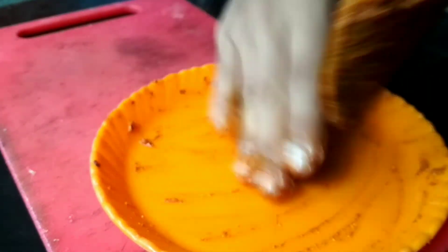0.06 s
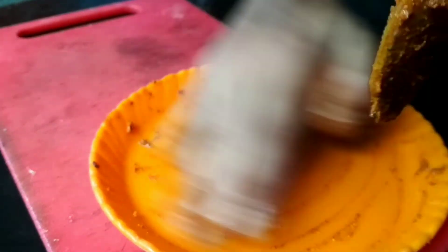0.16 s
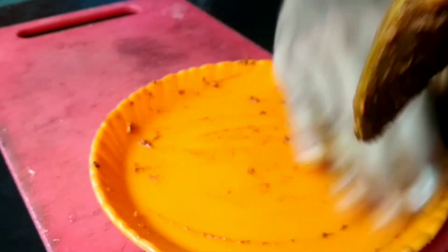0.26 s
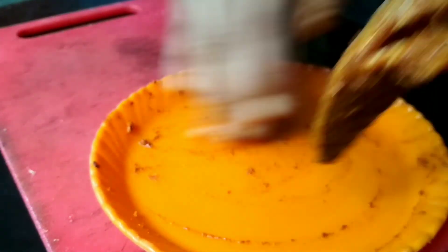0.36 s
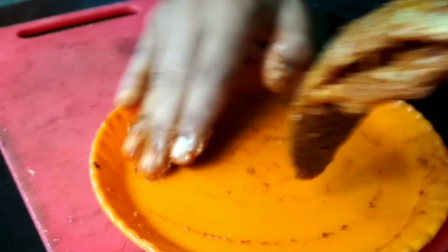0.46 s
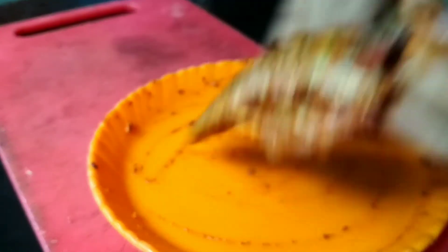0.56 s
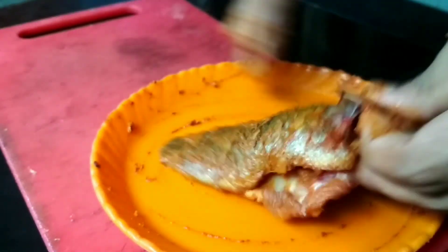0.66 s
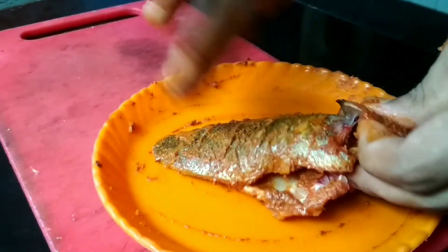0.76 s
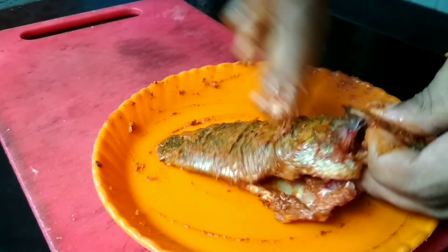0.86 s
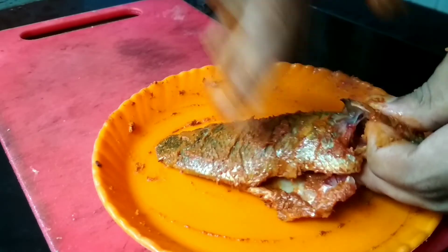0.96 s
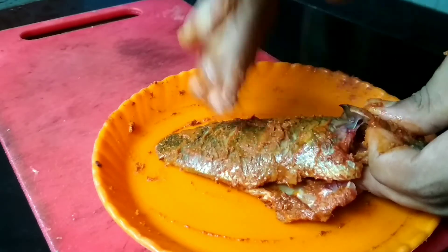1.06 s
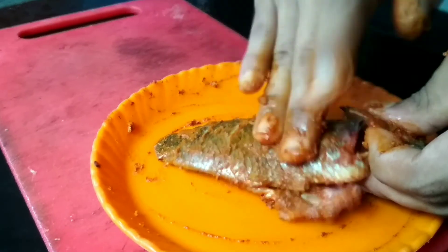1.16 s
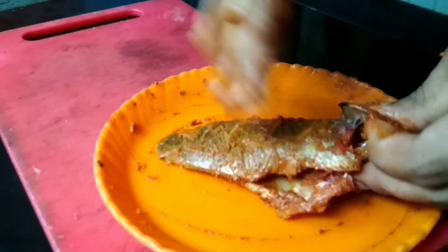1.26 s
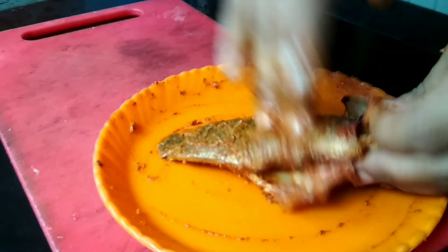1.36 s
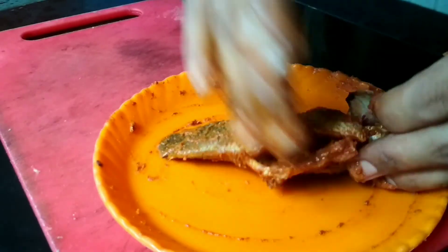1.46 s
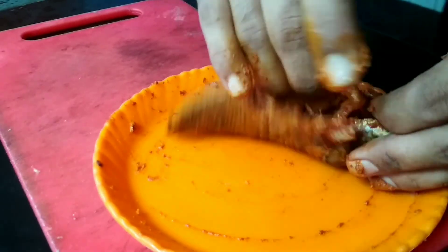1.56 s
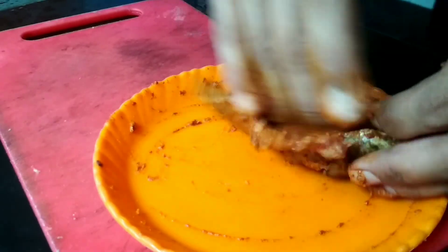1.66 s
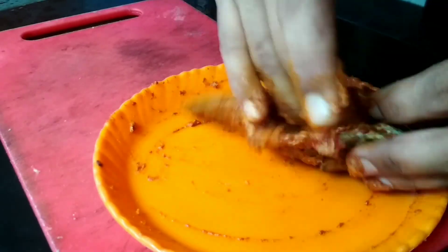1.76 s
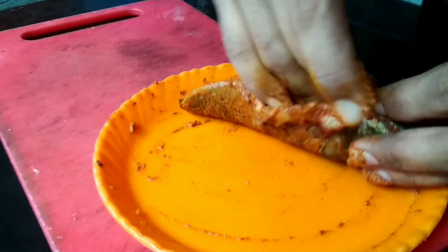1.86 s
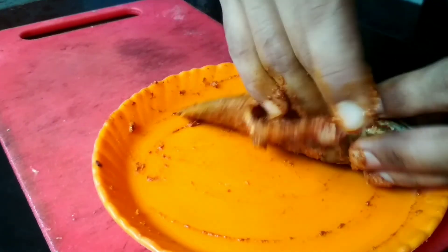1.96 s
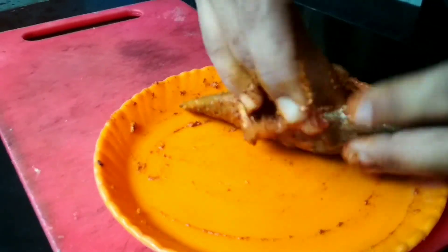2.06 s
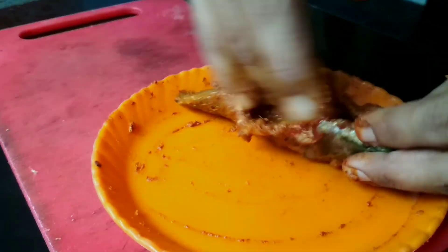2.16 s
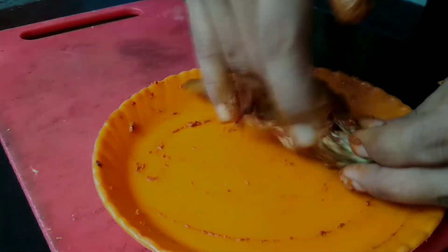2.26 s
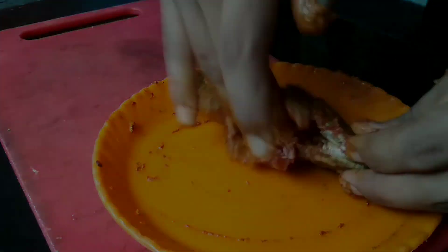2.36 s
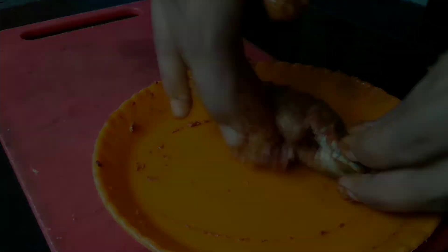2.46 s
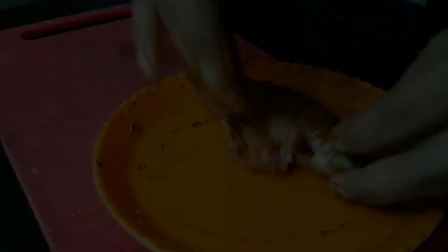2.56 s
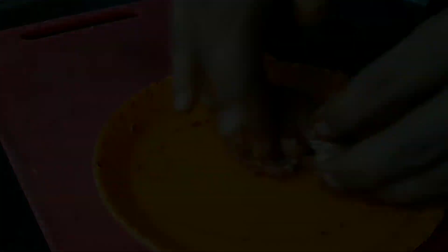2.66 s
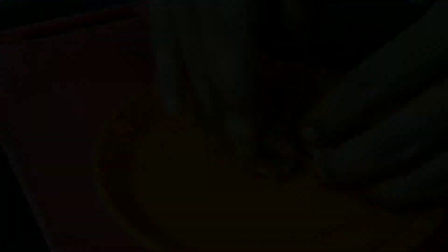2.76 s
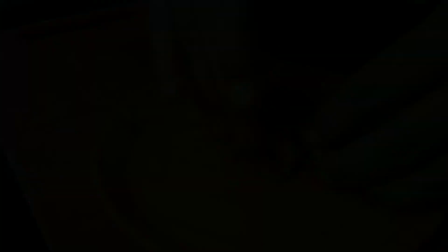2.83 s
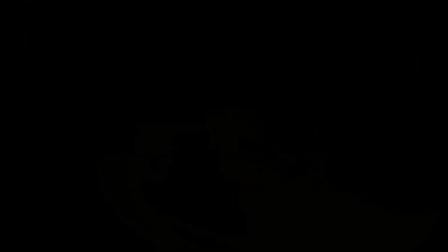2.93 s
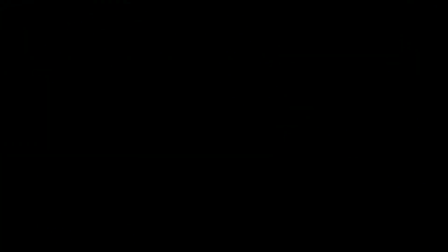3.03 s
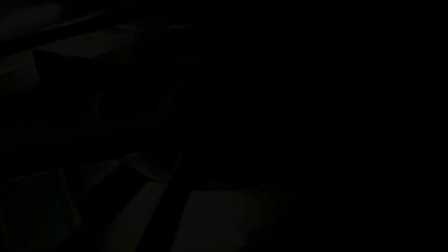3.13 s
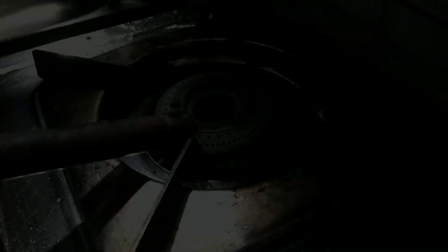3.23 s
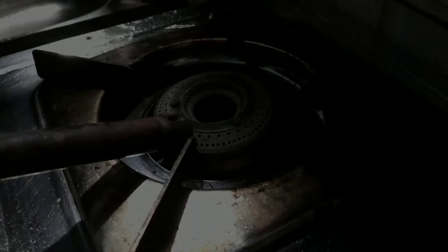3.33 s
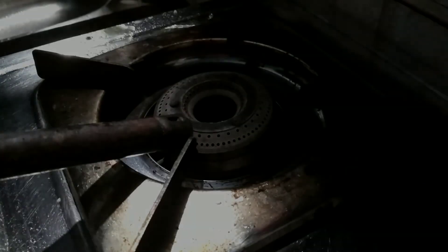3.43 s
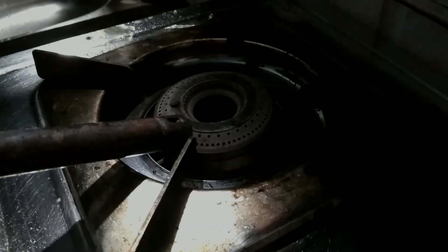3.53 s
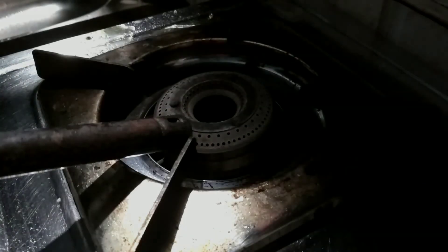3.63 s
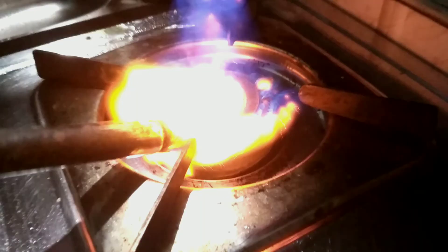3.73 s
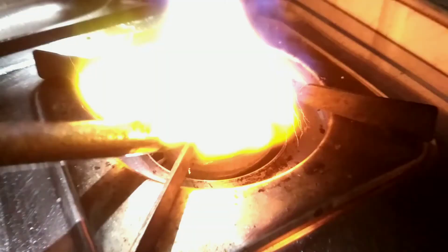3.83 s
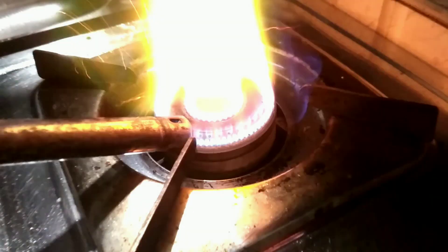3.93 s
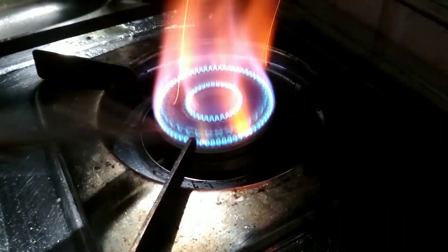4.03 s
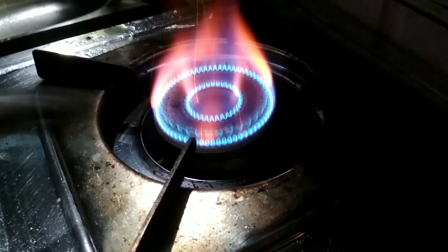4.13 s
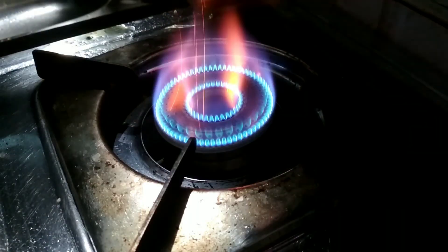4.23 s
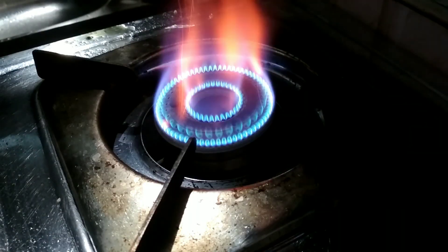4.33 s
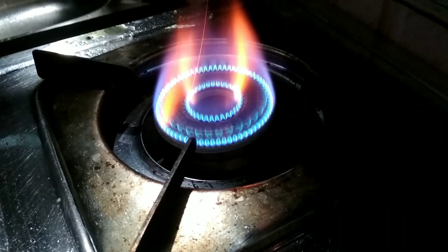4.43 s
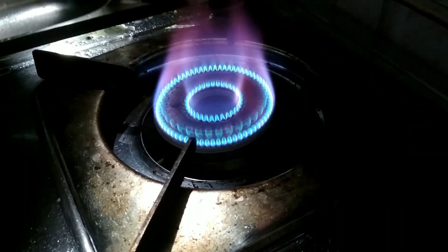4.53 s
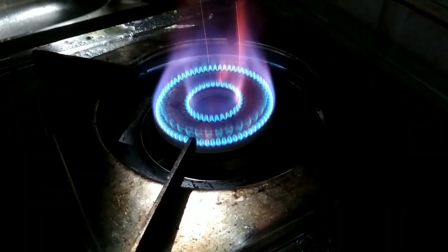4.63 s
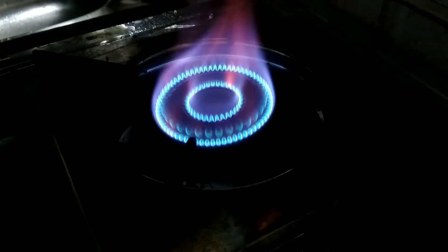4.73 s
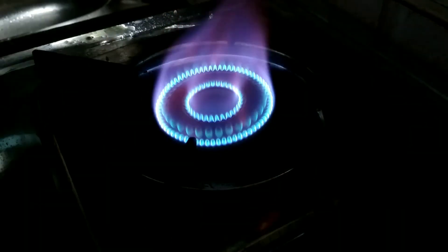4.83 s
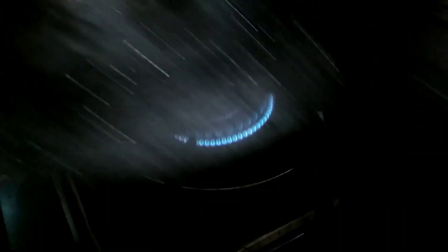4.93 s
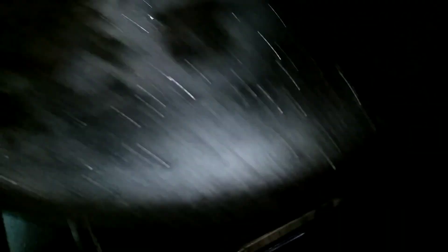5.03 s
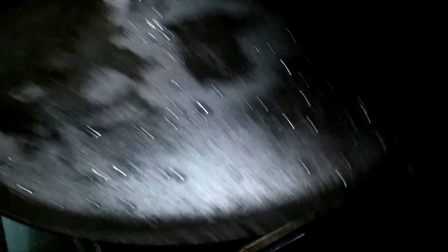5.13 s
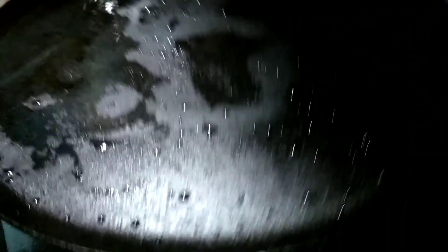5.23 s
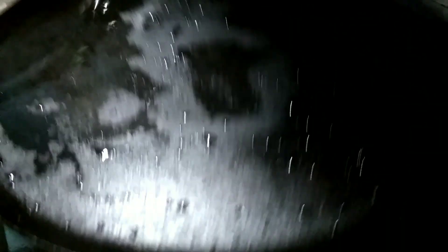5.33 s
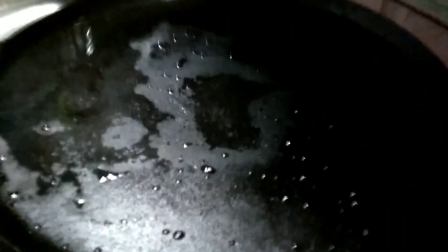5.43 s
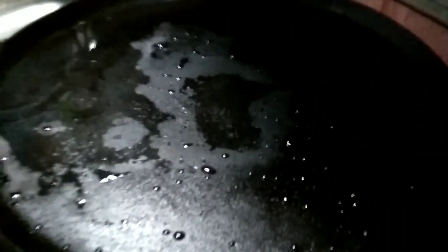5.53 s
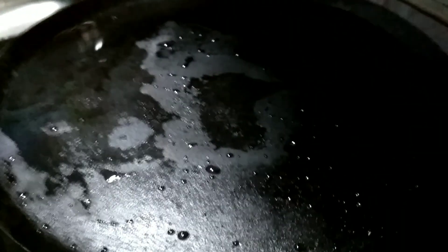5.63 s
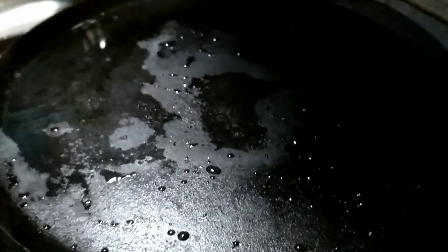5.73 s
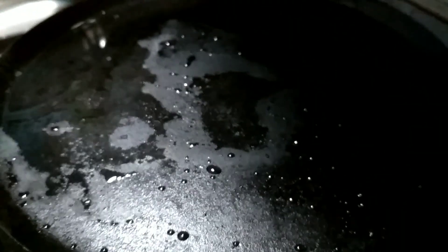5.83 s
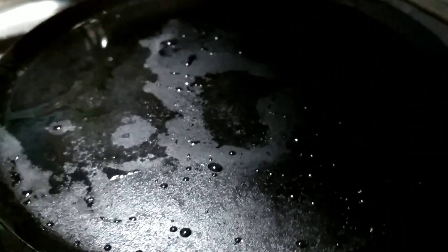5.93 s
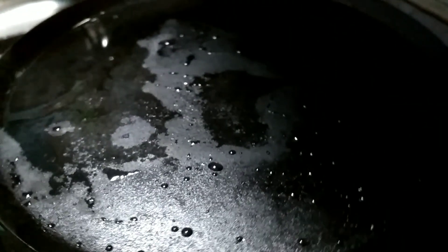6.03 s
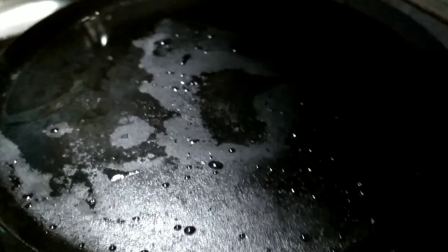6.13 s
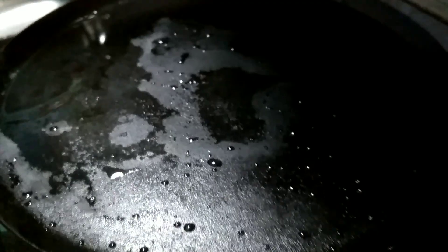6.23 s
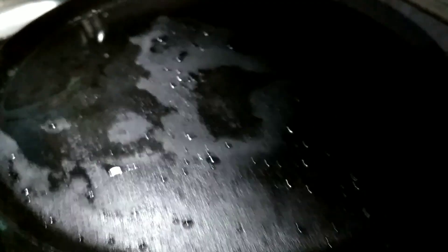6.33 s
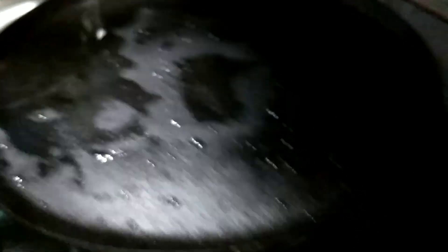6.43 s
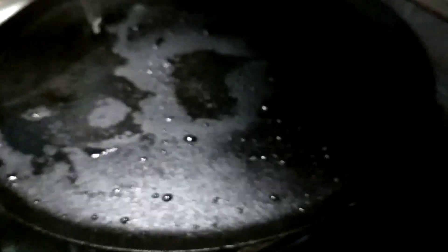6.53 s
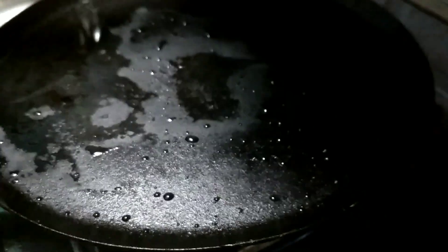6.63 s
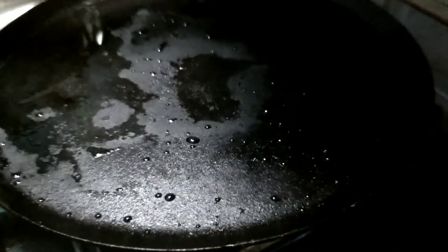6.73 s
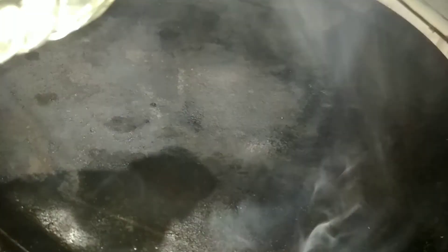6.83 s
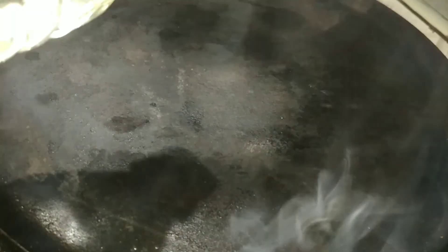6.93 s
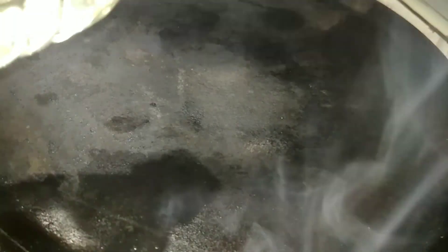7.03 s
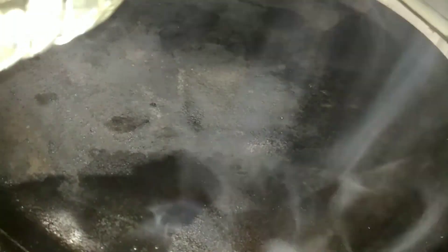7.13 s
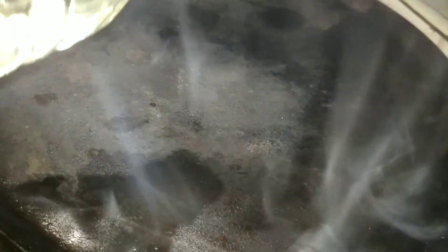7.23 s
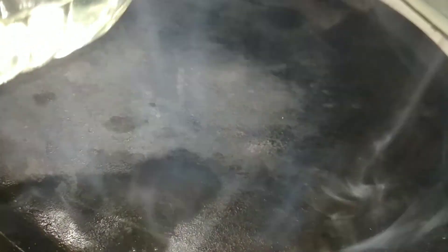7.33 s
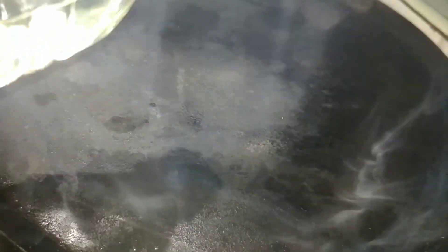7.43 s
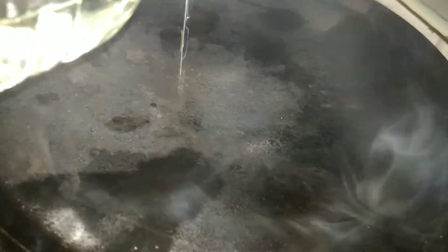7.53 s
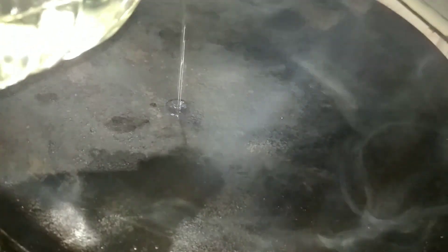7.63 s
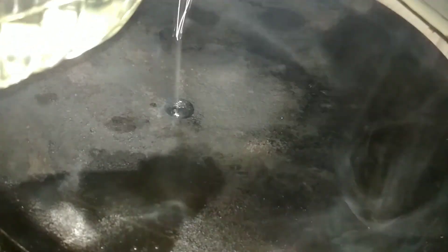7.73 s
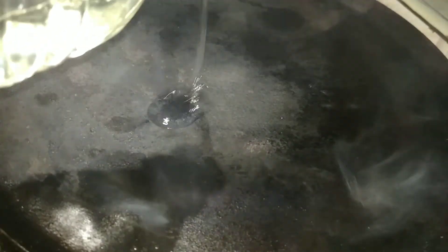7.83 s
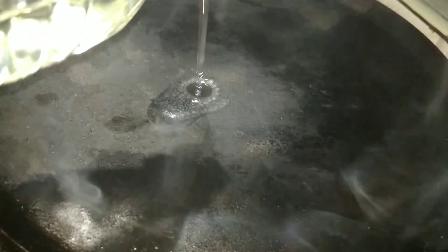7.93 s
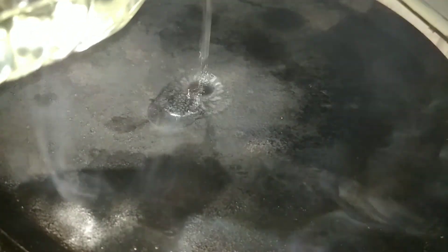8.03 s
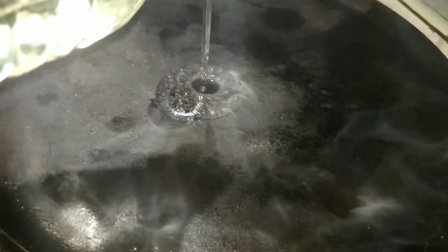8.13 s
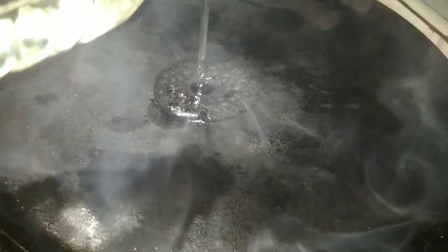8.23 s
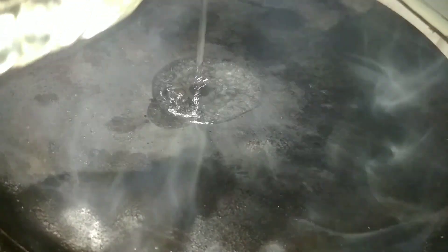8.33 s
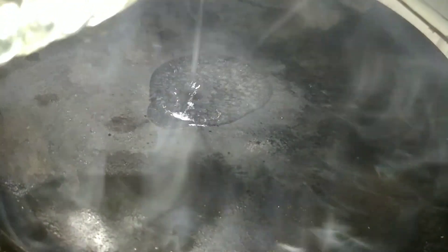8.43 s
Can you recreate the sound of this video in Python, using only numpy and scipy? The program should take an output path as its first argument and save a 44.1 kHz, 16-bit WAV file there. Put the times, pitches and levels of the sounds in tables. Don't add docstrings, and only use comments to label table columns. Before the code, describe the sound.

Close microphone, small home kitchen at night. From 0 to 2.5 s, hands press and slap sticky paste on a fish: soft plastic plate thuds near 0.2 to 0.8 s, then crisp wet snaps, strongest around 0.9 to 1.4 s, with smaller sticky pops after. Soft air, a very high cicada and faint hoarse crow calls at 0.6, 1.5 and 2.4 s lie behind; all fades by 3.16 s. Gas rushes and moans from 3.4 s, then at 3.82 s ignites with a sharp pop, low whoomp and bright fizz, settling into fluttering hiss. A metal knock follows at 4.04 s; a far cricket rises. At 5.5 s a heavy iron pan clangs down, shifts at 6.27 s, and scrapes harshly around 6.45 to 6.55 s, with a last knock at 6.8 s. From 7 s to 8.5 s, steady bright flame hiss and a close, rapidly pulsing cricket, left.

```python
import sys
import numpy as np
from scipy import signal
from scipy.fft import rfft, irfft
from scipy.io import wavfile
from scipy.ndimage import uniform_filter1d

SR = 44100
rng = np.random.default_rng(int(sys.argv[2]) if len(sys.argv) > 2 else 0)


def invert_db(level):
    return 10 ** (np.asarray(level, dtype=float) / 20)


def digitize_waveform(pressure):
    field = np.atleast_2d(pressure).T
    bounded = np.clip(field, -1, 1)
    quanta = np.round(bounded * 32767).astype(np.int16)
    wavfile.write(sys.argv[1], SR, quanta)


N = 374409

# pitch_hz, level_db (per Hz)
FLUTTER = [(15, -32), (25, -17), (75, 0.5), (137, -3), (316, -12.5), (386, -11), (616, -22.5), (889, -21.5),
           (1070, -34), (1350, -21), (1760, -52), (2970, -120)]
# pitch_hz, level_db (per Hz)
CHINK = [(1760, -20.5), (3000, -9), (3480, -9), (3890, -11), (4210, -7.5), (5170, -9), (5780, -10),
         (6570, -9.5), (12000, -1), (15200, -6.5), (16200, -65.5)]


def evened(x):
    return x / np.sqrt(np.mean(x ** 2) + 1e-20)


def read(points, hz):
    f, value = np.transpose(points)
    return np.interp(np.log(hz + 1), np.log(f + 1), value)


def curves(rows):
    s, *columns = np.transpose(rows)
    t = np.arange(N) / SR
    gate = np.clip(np.minimum(t - s[0], s[-1] - t) / .002, 0, 1)
    return gate, *(np.interp(t, s, c) for c in columns)


def wobble(hz):
    size = int(SR / hz)
    return evened(uniform_filter1d(uniform_filter1d(rng.standard_normal(N), size), size))


def white(grit_db=0.):
    # pitch_hz, likeness (0 to 1)
    likeness = [(60, 0.82), (180, 0.97), (550, 0.63), (1650, 0.019), (4970, 0.11), (15000, 0.02)]
    a, b = rfft(rng.standard_normal((2, N)))
    same = np.clip(read(likeness, np.fft.rfftfreq(N, 1 / SR)), 0, 1)
    pair = irfft([a, same * a + np.sqrt(1 - same ** 2) * b], N)
    return pair * invert_db(grit_db * wobble(200))


def coloured(x, spectrum):
    hz = np.fft.rfftfreq(N, 1 / SR)
    inside = (hz > spectrum[0][0]) & (hz < spectrum[-1][0])
    return evened(irfft(rfft(x) * invert_db(read(spectrum, hz)) * inside, N))


def resonate(x, hz, width):
    turn = np.exp(2j * np.pi * np.cumsum(hz * np.ones(N)) / SR)
    r = np.exp(-np.pi * width / SR)
    smooth = signal.lfilter([(1 - r) ** 2], [1, -2 * r, r * r], x / turn + 1e-18)
    return 2 * (turn * smooth).real


def panned(db):
    return invert_db([[db / 2], [-db / 2]])


def swell(s, db, rise, fall, power):
    t = np.arange(N) / SR
    return invert_db(db - 20 * np.maximum((s - t) / rise, (t - s) / fall) ** power)


def first_take_fade():
    t = np.arange(N) / SR
    return np.clip((3.16 - t) / (3.16 - 2.5), 0, 1) ** 1.63


def room_air():
    # pitch_hz, level_db (per Hz)
    air_colour = [(240, -50), (400, -28), (2470, -21), (2930, -18.5), (4180, -21), (5110, -18.5),
                  (5690, -20.5), (6240, -14), (6950, -19), (10100, -8), (11000, -6), (14600, -14),
                  (15650, -20)]
    # pitch_hz, level_db (per Hz)
    room_colour = [(18, -31), (35, -1.5), (120, -3.5), (400, -15.5), (700, -32)]
    # start_s, level_db
    rubbing = [(0.0, -73.5), (0.51, -72), (0.7, -74.5), (0.95, -75), (1.06, -67.5), (1.23, -72.5),
               (1.54, -69.5), (2.44, -69.5), (2.5, -71.5)]
    t = np.arange(N) / SR
    stir_db = curves(rubbing)[1]
    stir_db = stir_db - stir_db[:round(2.5 * SR)].mean()
    air_db = -62 + 0.82 * stir_db + 0.56 * wobble(2.8)
    hush_db = -6 * np.clip((t - 2.35) / 0.087, 0, 1)
    room_db = -71.5 + hush_db + 2.1 * wobble(19)
    air = invert_db(air_db) * coloured(white(0.63), air_colour)
    return air + invert_db(room_db) * coloured(white(), room_colour)


def cicada():
    song_hz = 10930 + 70 * wobble(6)
    loudness = invert_db(-64 + 1.5 * wobble(11))
    rough = resonate(white(), song_hz, 150)
    clear = evened(resonate(white(), song_hz, 40))
    return loudness * evened(rough * 3 + 0.76 * clear / 4)


def cricket(start, hz, width, db, pulses_hz, depth, chirp_hz, chirp_s, depth_db, rough):
    t = np.arange(N) / SR
    stroke = 2 * np.pi * np.cumsum(pulses_hz * (1 + 0.012 * wobble(2.5))) / SR
    chirps = invert_db(depth_db * np.cos(2 * np.pi * chirp_hz * (t - chirp_s)))
    bend = 0.45 * np.sin(stroke + 2.16)
    tone = np.cos(2 * np.pi * np.cumsum(hz + 13 * wobble(6.52)) / SR + bend)
    voice = (1 - rough) * tone + rough * evened(resonate(white(), hz, width))
    song = evened((1 + depth * np.cos(stroke)) * chirps * voice)
    return invert_db(db) * song * np.clip((t - start) / 0.071, 0, 1)


def crickets():
    rise = np.clip((np.arange(N) / SR - 3.2) / 1.37, 0, 1)
    far = rise * cricket(3.2, hz=7034, width=591, db=-62.0, pulses_hz=50.3, depth=0.4,
                         chirp_hz=7.83, chirp_s=7.108, depth_db=2.7, rough=0.8)
    near = cricket(6.975, hz=5278, width=220, db=-51.0, pulses_hz=53.03, depth=0.56,
                   chirp_hz=3.03, chirp_s=6.6, depth_db=0.36, rough=.25)
    return far + near * panned(8.1)


def crow_calls():
    # start_s, length_s, level_db, pitch_hz
    crows = [
        (0.619, 0.27, -59, 1188),
        (1.513, 0.37, -63.5, 1190),
        (2.407, 0.27, -64.5, 1203),
    ]
    out, t = 0, np.arange(N) / SR
    for s, length, db, hz in crows:
        u = np.clip((t - s) / length, 0, 1)
        arch = abs(np.sin(np.pi * u ** 0.56)) ** 1.5
        throat_hz = hz * (1 - 0.069 * np.exp(-u / 0.15))
        out = out + invert_db(db) * arch * evened(resonate(white(), throat_hz, 116))
    return out * panned(-1.3)


def blurred_sounds():
    # start_s, length_s, level_db, pitch_hz, width_hz
    blurs = [(2.475, 0.27, -67.5, 3210, 605), (2.548, 0.23, -66, 2530, 300), (2.7, 0.23, -61.5, 3063, 149),
             (2.73, 0.062, -65, 2270, 300), (2.81, 0.2, -66, 3515, 120), (2.86, 0.22, -73, 2520, 720),
             (3.329, 0.032, -61, 1300, 250), (3.65, 0.22, -68, 1290, 1450), (1.774, 0.14, -61, 5700, 2610),
             (3.666, 0.19, -60, 11900, 5030), (4.498, 0.25, -65, 2963, 124), (5.936, 0.12, -41, 235, 49),
             (6.989, 0.11, -48, 290, 39), (8.102, 0.38, -69, 3300, 1190), (8.099, 0.81, -57, 12000, 5000)]
    out, t = 0, np.arange(N) / SR
    for s, length, db, hz, width in blurs:
        u = np.clip((t - s) / length, 0, 1)
        out = out + invert_db(db) * np.sin(np.pi * u ** 0.38) * evened(resonate(white(), hz, width))
    return out


def plate():
    presses = [(0.01, -69, .05, 0.28, 185.5), (0.17, -55.5, 0.019, 0.19, 177.2),
               (0.38, -58.5, 0.076, 0.18, 189.2), (0.526, -50.5, 0.048, 0.049, 191.8),
               (0.65, -58, 0.032, 0.14, 179), (0.779, -50, 0.079, 0.035, 181.3),
               (0.99, -69.5, 0.034, 0.13, 192.7), (1.23, -64, 0.11, 0.29, 187.1),
               (1.654, -62, .04, 0.089, 183.1), (2.04, -71.5, 0.16, 0.058, 179),
               (2.17, -61, 0.016, 0.035, 200.3), (2.31, -64.5, 0.083, 0.17, 341.7),
               (2.53, -65, 0.042, 0.052, 333.5)]
    pressed = np.array([swell(*row[:4], 1.06) for row in presses])
    plate_hz = uniform_filter1d(np.array(presses)[pressed.argmax(0), -1], size=800)
    thud = evened(resonate(white(), plate_hz, 70))
    note = evened(np.sin(2 * np.pi * np.cumsum(plate_hz) / SR))
    clear = 0.4
    drum = evened((1 - clear) * thud + clear * note)
    return pressed.max(0) * invert_db(2.7 * wobble(49.0)) * drum


def smacks():
    # start_s, level_db (peak), dull_db (re peak), dull_hz
    hits = [(0.0583, -66, -30, 3390), (0.577, -47.5, -23, 1397), (0.6719, -53.5, -25, 1120),
            (0.712, -50, -23, 1110), (0.8727, -41.5, -45, 5000), (0.8878, -38.5, -40, 6030),
            (1.0282, -41, -6.5, 5700), (1.0396, -45, -10, 4480), (1.048, -35, -19.5, 1480),
            (1.1238, -47.5, -22, 4810), (1.107, -47, -23, 2940), (1.199, -34.5, -10.5, 4240),
            (1.2195, -48.5, -10, 4070), (1.2398, -45, -9, 6130), (1.3512, -32.5, -21.5, 1500),
            (1.4333, -46.5, -37, 6430), (1.503, -45, -38, 1983), (1.5943, -38, -21, 5000),
            (1.741, -46, -28.5, 1190), (1.954, -49, 1, 6440), (2.0444, -53, -14, 6190),
            (2.0805, -47, -4.5, 6150), (2.1594, -54, -11, 1200), (2.26, -54, -5, 1690),
            (2.3099, -43, -13, 1970), (2.408, -41.5, -15.5, 1910), (2.4442, -39.5, -22, 2000),
            (2.5216, -48.5, -31.5, 2000), (2.5947, -61, -28, 2400), (2.85, -71, -28, 5000)]
    # pitch_hz, level_db (per Hz)
    snap_colour = [(6000, -24), (8000, -11), (11500, 0), (14500, -6.5), (16200, -15)]
    # start_s, level_db
    small_pops = [(0.947, -45), (0.9743, -46), (1.087, -43), (1.362, -41), (1.374, -43.5), (1.443, -48.5),
                  (1.453, -44.5), (1.497, -49), (2.0988, -48), (2.2944, -46)]
    bright, dull, dull_hz = np.zeros((3, N))
    stray = rng.random(N) < 30 / SR
    pops = first_take_fade() * stray * invert_db(-62 + 3.7 * rng.exponential(1, N).clip(0, 2))
    pops[(np.array(small_pops)[:, 0] * SR).astype(int)] = invert_db(np.array(small_pops)[:, 1])
    bright += signal.lfilter([1], [1, -invert_db(-60 / (.01 * SR))], pops)
    u = np.arange(3000) / SR
    for s, db, dull_db, hz in hits:
        t60 = .07 + .004 * max(db + 50, 0)
        snap = invert_db(db + 4 - 60 * u / .011) + invert_db(db - 13 - 60 * u / t60)
        tail = (snap - invert_db(db + 1.5 - 60 * u / 0.0085)).clip(0)
        at = round(s * SR)
        bright[at:at + 3000] += snap
        dull[at:at + 3000] += tail * invert_db(dull_db + 2.5)
        dull_hz[at:] = hz
    snaps = np.std(bright) * coloured(bright * white(1.3), snap_colour)
    return snaps + dull * evened(resonate(white(0.46), dull_hz, 2950))


def plate_take():
    background = first_take_fade() * (room_air() + cicada())
    return (background + plate() + smacks()) * panned(-5.5)


def burst(parts):
    u = np.arange(N) / SR - 3.817
    power = sum(invert_db(db - rate * np.maximum(u - hold, 0)) ** 2 for db, hold, rate in parts)
    return np.clip(u / .002, 0, 1) * np.sqrt(power)


def gas_tube():
    # start_s, level_db
    rush = [(3.18, -103), (3.212, -80), (3.306, -72.5), (3.378, -60.5), (3.408, -66.5), (3.46, -51),
            (3.5, -54.5), (3.77, -63.5), (3.8, -77)]
    # pitch_hz, width_hz, level_db
    tube = [(240, 21, -1.5), (290, 38, -1.5), (570, 83, -9), (1006, 19, -17.5), (1300, 230, -19.5),
            (505, 510, -9.5)]
    on, level_db = curves(rush)
    moan = sum(invert_db(db) * evened(resonate(white(), hz, width)) for hz, width, db in tube)
    return on * invert_db(level_db) * evened(moan)


def burner():
    # start_s, level_db
    gas = [(3.15, -30.5), (3.24, -16.5), (3.5, -11), (3.81, -1), (4.27, 2.5), (6.9, 1.5), (7.2, 2),
           (8.49, 3.5)]
    # pitch_hz, width_hz, level_db
    ports = [(1618, 206, -8), (4480, 510, -0.5), (8480, 1100, -5), (9360, 1500, -0.5), (10670, 600, -5.5),
             (12870, 300, -4), (11930, 2700, 0), (13900, 500, -7.5), (3860, 1200, -18.5),
             (4800, 400, -12.5)]
    # pitch_hz, level_db
    whistle = [
        (11746, -66),
        (14099, -79.5),
    ]
    # pitch_hz, level_db (per Hz)
    simmer = [(15, -40.5), (25, -0.5), (85, 1), (194, -4), (260, -12.5), (501, -20), (700, -40),
              (910, -68.5), (1540, -120)]
    # level_db, hold_s, decay_db_per_s
    flare = [(-49.5, 0.17, 40)]
    t = np.arange(N) / SR
    gate, gas_db = curves(gas)
    hiss = sum(invert_db(db) * evened(resonate(white(), hz, width)) for hz, width, db in ports)
    whine = 0
    for hz, db in whistle:
        cycles = hz * t + 10 * np.maximum(t - 6.98, 0)
        whine = whine + invert_db(db + 4.0 + .8 * wobble(8.7)) * np.sin(2 * np.pi * cycles)
    flutter = np.where(t < 6.97, coloured(white(2.0), FLUTTER), coloured(white(1.2), simmer))
    flame = np.hypot(invert_db(-57 + 1.27 * np.minimum(gas_db, 0)), burst(flare))
    steady = invert_db(-67.5 + gas_db) * hiss + flame * flutter
    return gate * (steady + whine * np.clip((t - 3.2) / 1.2, 0, 1))


def ignition():
    # pitch_hz, level_db (per Hz)
    roar = [(15, -48.5), (25, -41), (91, -6), (176, -10.5), (237, -2), (320, -12.5), (644, -11.5),
            (905, -19), (1300, -15.5), (4000, -41.5), (5200, -69), (8800, -120)]
    fizz = [(1760, -17), (3000, -15.5), (4750, -13), (5430, -14), (6850, -13), (8520, -13), (11700, -5.5),
            (15600, -20), (16200, -40)]
    # level_db, hold_s, decay_db_per_s
    roar_fall = [(-19, 0.03, 203), (-35.5, 0.072, 70.5)]
    fizz_fall = [(-27, 0.0037, 1800), (-33, 0.097, 133), (-45, 0.21, 90)]
    whoomp = burst(roar_fall) * coloured(white(0.51), roar)
    whoomp = whoomp + burst(fizz_fall) * coloured(white(0.46), fizz)
    u = np.maximum(np.arange(N) / SR - 3.8183, 0) / 0.00026
    pop = invert_db(-4.0) * u * (1 - u / 2) * np.exp(-u)
    return whoomp + pop


def scrape_force():
    scrapes = [(5.6, -42.5, 0.094, .05, 12), (5.65, -31.5, 0.072, 0.25, -6.5),
               (5.95, -42, 0.12, 0.12, -8.5), (6.125, -41.5, 0.11, 0.46, -10),
               (6.285, -41.5, 0.022, 0.23, -6.5), (6.451, -23.5, 0.13, 0.22, -12.5),
               (6.548, -23.5, 0.21, 0.098, -12.5), (6.69, -41, .05, 0.17, -11.5),
               (6.808, -30.5, 0.012, 0.066, -28.5), (6.89, -47.5, .08, 0.18, -19)]
    t = np.arange(N) / SR
    landed = t > 5.5035
    strokes = np.array([swell(*row[:4], 1.405) for row in scrapes]) * landed
    low = invert_db(-7.0) * np.linalg.norm(strokes, axis=0)
    rattle = invert_db(2.0 + 1.6 * wobble(45))
    high = rattle * np.linalg.norm(strokes * invert_db(np.array(scrapes)[:, -1:]), axis=0)
    return low, high


def add_knocks(low, high):
    # start_s, level_db, bright_db (re level), chatter_s, t60_s (time to fall 60 dB)
    knocks = [
        (3.331, -63.5, -14, 0.012, 0.38),
        (4.038, -37, -8.5, 0.0042, 0.057),
        (5.5035, -15.5, -15, 0.045, 0.28),
        (5.941, -60, -13, 0.028, 0.16),
        (6.266, -30, -10.5, 0.021, 0.11),
        (6.68, -43.5, -26, 0.038, 0.087),
        (6.8048, -36.5, -14.5, 0.021, 0.091),
        (6.087, -63, 12, 0.0073, .08),
        (8.087, -60.5, 14.5, .003, 0.11),
    ]
    # start_s, level_db, t60_s
    ticks = [(4.04, -46, .03), (4.612, -66, .02), (4.87, -61, .02), (5.5045, -19, 0.035),
             (5.5085, -19.5, 0.034), (5.717, -35.5, 0.22), (5.9119, -47, .1), (5.9792, -50, .1),
             (6.1249, -42, 0.11), (6.1867, -48, .08), (6.2182, -46, .03), (6.2666, -36, .12),
             (6.3748, -37.5, .5), (6.40, -36, 0.33), (6.452, -41, .1), (6.59, -45, 0.08), (6.70, -49, .15),
             (6.8822, -46, .03), (6.9115, -49, .03)]
    t = np.arange(N) / SR
    for s, db, bright_db, chatter, t60 in knocks:
        u = t - s
        blow = (u > 0) * invert_db(db - 60 * np.maximum(u - chatter, 0) / t60)
        first_tick = 1 + 1.5 * np.exp(-abs(u) / 0.0032)
        low = np.hypot(low, blow * np.clip(u / 0.0034, 0, 1))
        high = np.hypot(high, blow * invert_db(bright_db) * first_tick)
    for s, db, t60 in ticks:
        high = np.hypot(high, (t > s) * invert_db(db - 60 * abs(t - s) / t60))
    return low, high


def forest(count=140):
    hz, life, phase = rng.random((count, 3)).T[:, :, None]
    t = np.arange(8192) / SR
    t60 = 0.18 * (1.3 - hz) * (.4 + life)
    ring = (invert_db(-60 * t / t60) * np.sin(2 * np.pi * ((2200 + 13300 * hz) * t + phase))).sum(0)
    shaped = irfft(rfft(ring) * invert_db(read(CHINK, np.fft.rfftfreq(len(t), 1 / SR))), len(t))
    return shaped / np.linalg.norm(shaped)


def pan():
    # pitch_hz, level_db, t60_s
    modes = [(200, -6, .1), (239, -3, .2), (357, -10, .26), (405, -14, .25), (626, -11, .23),
             (688, -14, .23), (760, -14, .2), (824, -14, .25), (858, -13, .36), (1015, -20, .2),
             (1412, -22, .2), (2137, -31, .3), (2900, -38, .25), (3370, -30, .35), (4107, -42, .3),
             (4624, -34, .11), (5023, -42, .3), (5346, -42, .35), (6062, -42, .35), (6740, -38, .28),
             (7262, -40, .3), (8102, -40, .3)]
    # pitch_hz, level_db (per Hz)
    clang = [(40, -60), (60, -34), (128, -12), (223, -0.5), (287, -2), (404, -3), (439, -11), (617, -3),
             (849, -14), (964, -9.5), (1640, -16), (2160, -17), (4000, -34), (5200, -74.5), (8800, -120)]
    low, high = scrape_force()
    stove = invert_db(-30.5) * low ** .5 * coloured(white(), FLUTTER) / 2
    low, high = add_knocks(low, high)
    out = low * coloured(white(1.1), clang) + invert_db(-1) * high * coloured(white(1.3), CHINK)
    out += invert_db(-4) * signal.fftconvolve(white(1.3) * high, forest()[None], axes=1)[:, :N]
    force, t = white(1.3), np.arange(SR) / SR
    deep, thin = np.zeros((2, SR))
    for hz, db, t60 in modes:
        ring = invert_db(db - 60 * t / min(t60, .35)) * np.sin(2 * np.pi * hz * t)
        if hz < 2500:
            deep += ring
        else:
            thin += ring
    out += invert_db(-30.0) * signal.fftconvolve(force * low, deep[None], axes=1)[:, :N]
    out += invert_db(2.5) * signal.fftconvolve(force * high, thin[None], axes=1)[:, :N] / 10
    squeak = swell(6.578, -33, 0.064, 0.052, 1.2) * evened(resonate(white(), 4500, 126))
    return out + stove + squeak


def scene():
    outside = crickets() + crow_calls() + blurred_sounds()
    stove = gas_tube() + burner() + ignition()
    return outside + plate_take() + stove + pan()


def thin_treble(x):
    # pitch_hz, spare_db
    spare = [(1900, 12), (3200, 4.5), (4300, 2.2), (6000, -1), (8000, 2), (10100, 1), (12000, 3.6),
             (14500, 2.5), (15300, -2), (15800, -12)]
    hz, _, z = signal.stft(x, SR, nperseg=2048, noverlap=1536)
    raw = (abs(z) ** 2).mean(0) + 1e-20
    power = uniform_filter1d(raw, size=3, axis=1)
    narrow_db = 10 * np.log10(abs(uniform_filter1d(power, size=4, axis=0)) + 1e-20)
    around_db = uniform_filter1d(narrow_db, size=120, axis=0)
    busy_db = 2.5 * np.exp(-((10 * np.log10(power.sum(0)) + 44) / 7) ** 2)
    luck = rng.standard_normal(raw.shape)
    luck = evened(uniform_filter1d(uniform_filter1d(luck, size=11, axis=0), size=9, axis=1))
    spare_db = narrow_db - around_db - busy_db + read(spare, hz)[:, None] + 3.5 * luck
    treble = raw[hz > 3000].sum(0)
    attack = np.roll(treble, -1) > 4 * np.roll(treble, 2)
    keep = 1 / (1 + np.exp(-np.clip((spare_db + 12 * attack) * 4, -40, 40)))
    keep[hz < 1900] = 1
    keep[hz > 16300] = 0
    return signal.istft(z * keep, SR, nperseg=2048, noverlap=1536)[1][:, :N]


def top_cut(x):
    return signal.sosfilt(signal.butter(12, 16450, fs=SR, output="sos"), x)


def record(dry):
    limited = .75 * np.tanh(dry / .75)
    mix = thin_treble(limited)
    return top_cut(mix)


dry = scene()
out = record(dry)
digitize_waveform(out)
```